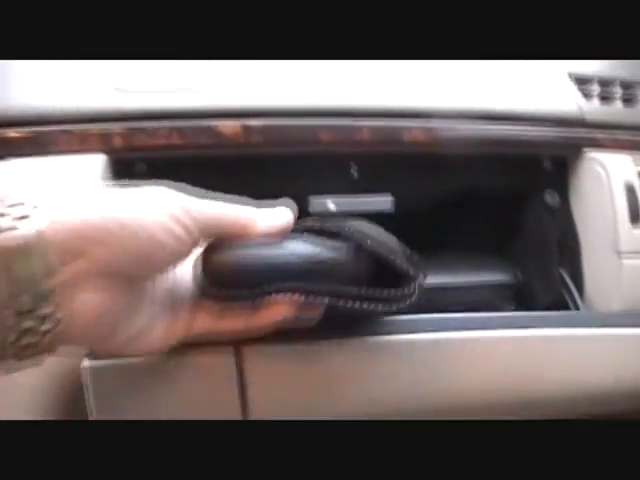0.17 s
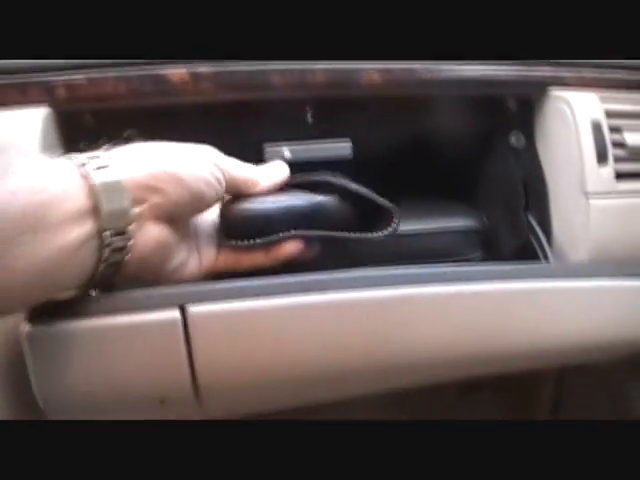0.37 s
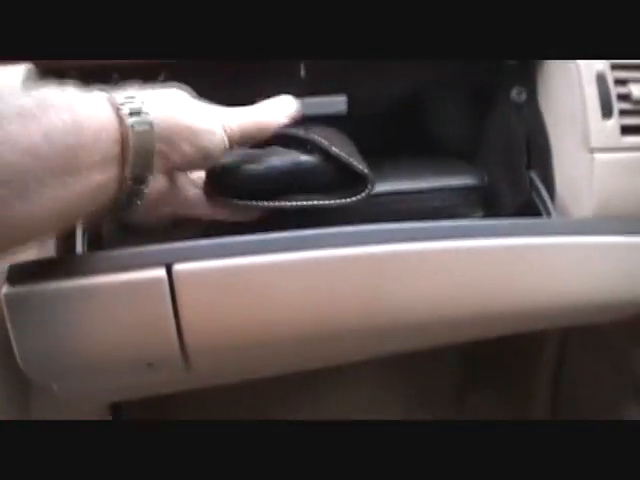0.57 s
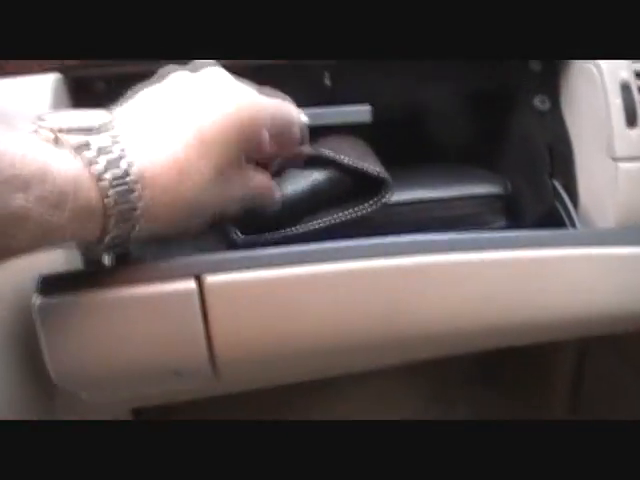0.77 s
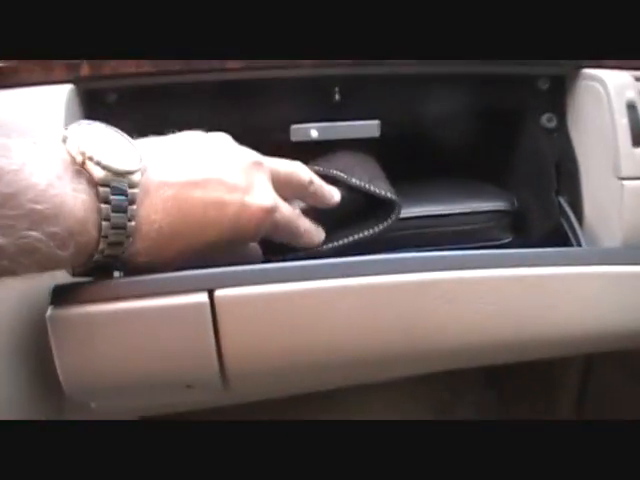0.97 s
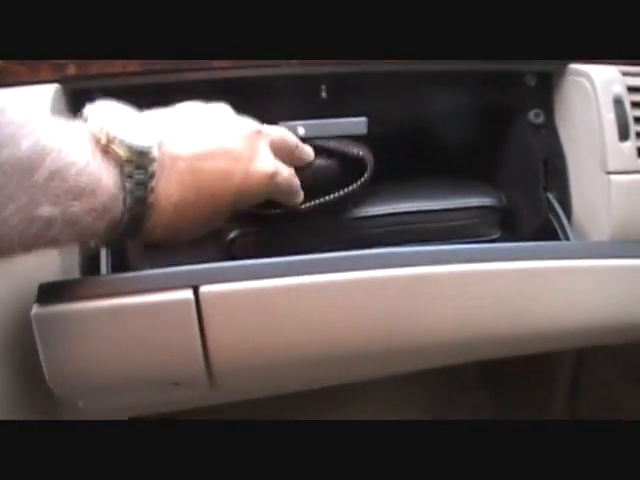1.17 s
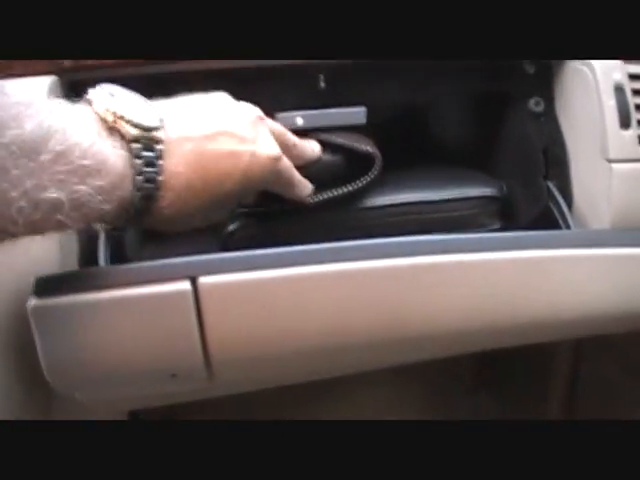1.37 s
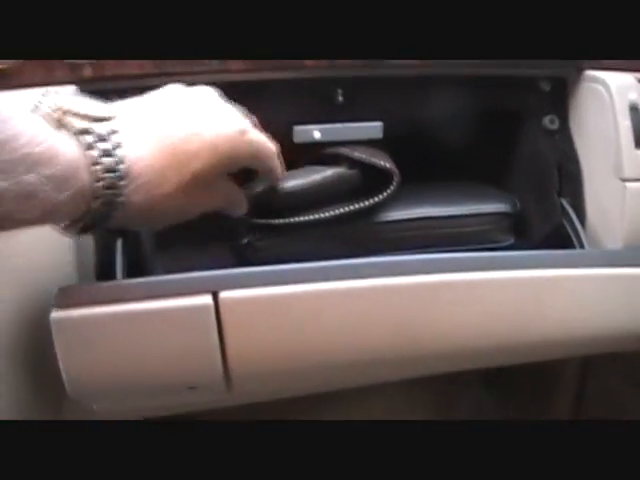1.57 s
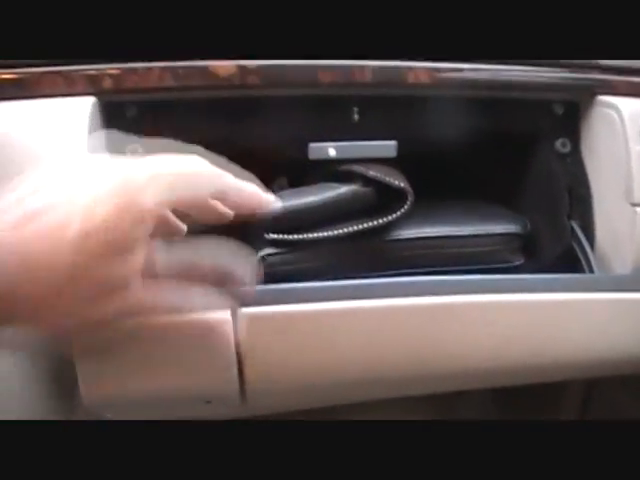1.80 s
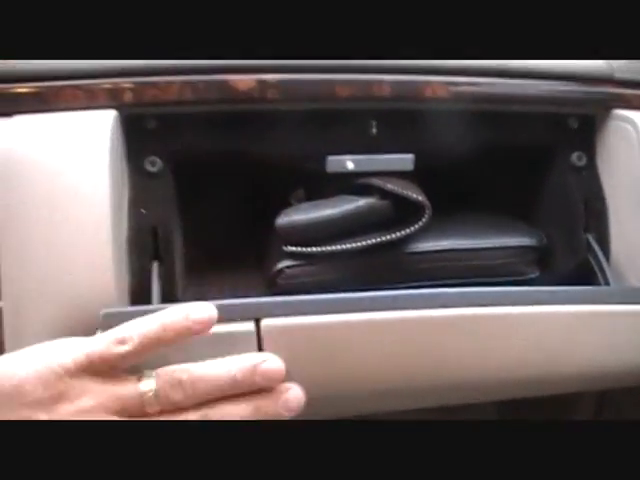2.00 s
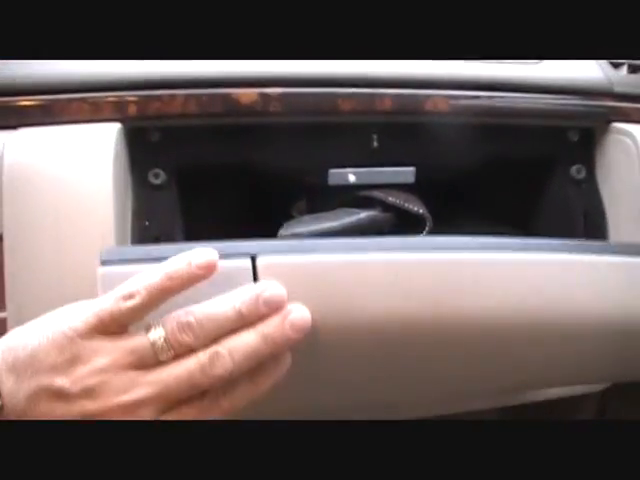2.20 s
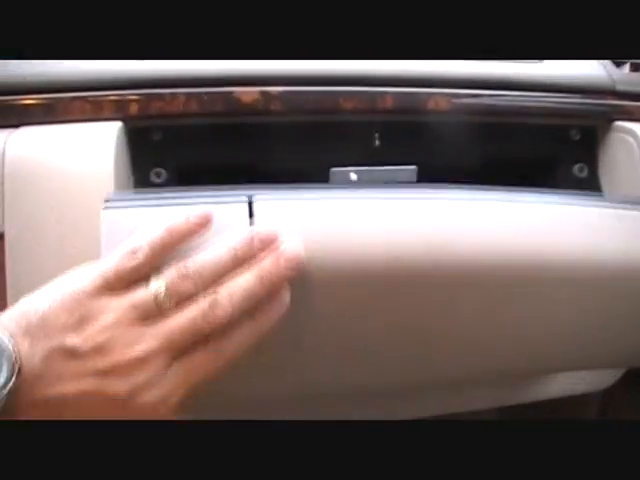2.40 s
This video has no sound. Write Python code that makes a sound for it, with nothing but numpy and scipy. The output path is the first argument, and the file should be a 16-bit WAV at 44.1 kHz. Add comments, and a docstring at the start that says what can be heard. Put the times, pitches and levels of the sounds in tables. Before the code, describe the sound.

A leather case goes into a car glove compartment: faint clicks and thin watch-band ticks, then a loud scrape and hollow double knock around 0.25-0.35 s. Leather slides from 0.4 to 0.75 s with plastic clicks, is nudged again near 1.1 s, and settles with a soft low thump at 1.2 s. A click at 1.7 s, then lid rattles from 2.05 s. Close, dry, faint cabin hiss.

```python
"""A leather case, dropped by a hand into the open glove compartment of a parked car, slides along the lining.
Filtered noise makes its scrapes, hiss and dull knocks; decaying modes make the ring of the hollow box.
Short noise bursts with modes make the clicks and lid rattle as the lid is pushed up, and the watch band's ticks.
Sagging tones make soft thumps. The small padded cabin is almost dead: only faint air hiss, no reverberation."""
import sys
import numpy as np
from scipy import signal
from scipy.fft import rfft, irfft
from scipy.io import wavfile

SR = 44100
rng = np.random.default_rng(int(sys.argv[2]) if len(sys.argv) > 2 else 0)


def store_wav(level_fs):
    """Save 16-bit WAV to argv[1]."""
    pcm = np.round(np.clip(np.atleast_2d(level_fs), -1, 1) * 32767)
    wavfile.write(sys.argv[1], SR, pcm.T.astype(np.int16))


N = 108045
TIME = np.arange(N) / SR  # s


def from_db(db):
    """Level definition: an amplitude ratio is 10 to the power dB/20."""
    return 10 ** (np.asarray(db) / 20)


def rms_one(x):
    """Normalisation: scale to unit root-mean-square amplitude."""
    return x / np.sqrt(np.mean(x ** 2) + 1e-20)


def at_hz(points, hz):
    """Logarithmic frequency scale: interpolate a table linearly in log f."""
    f, value = np.transpose(points)
    return np.interp(np.log(hz), np.log(f), value)


def level_curve(rows):
    """Amplitude envelope: gain through (t/s, level/dB) points, silent before the first."""
    s, db = np.transpose(rows)
    return from_db(np.interp(TIME, s, db)) * (TIME >= s[0])


def decay(age, t60):
    """Exponential decay: the level falls 60 dB in each t60."""
    return np.exp(-np.log(1000) * age / t60)


def burst(start, hold, t60):
    """Transient envelope: sudden start, hold, exponential decay."""
    age = TIME - start
    fade = np.maximum(decay(np.maximum(age - hold, 0), t60), np.exp(-20))
    return (age >= 0) * fade


def band_noise(edges):
    """Band limitation: white noise through a band-pass filter, rms 1."""
    sos = signal.butter(3, edges, "band", fs=SR, output="sos")
    return rms_one(signal.sosfilt(sos, rng.standard_normal(N)))


def coloured(spectrum):
    """Spectral shaping: weight noise by a table of f/Hz, density/dB, then scale to rms 1."""
    hz = np.maximum(np.arange(N // 2 + 1) * SR / N, 1)
    white = rfft(rng.standard_normal(N))
    return rms_one(irfft(white * from_db(at_hz(spectrum, hz)), N))


def grain(per_s, depth_db):
    """Amplitude modulation: the quick random flutter of a rubbing contact, rms 1."""
    steps = rng.standard_normal(N)
    return rms_one(from_db(depth_db * np.interp(TIME * per_s, np.arange(N), steps)))


def impulses(rows):
    """Impulsive excitation: one impulse for each (t/s, level/dB)."""
    out = np.zeros(N)
    for s, db in rows:
        out[int(np.clip(s * SR, 0, N - 1))] += from_db(db)
    return out


MODE_SPREAD_S = .003  # the modes reach the ear up to this much apart


def ring(force, modes):
    """Modal superposition: a force drives damped resonators, each heard a little late."""
    out = 0
    for (hz, db, t60), late in zip(modes, rng.random(len(modes))):
        r = decay(1 / SR, t60)
        w = 2 * np.pi * hz / SR
        tone = signal.lfilter([0, np.sin(w)], [1, -2 * r * np.cos(w), r * r], force + 1e-18)
        # nothing sounds far below a mode
        tone = signal.sosfilt(signal.butter(2, hz / 2, "high", fs=SR, output="sos"), tone)
        delay = int(late * MODE_SPREAD_S * SR)
        out = out + from_db(db) * np.pad(tone, (delay, 0))[:N]
    return out


# dull knocks of the case on the box: t/s, relative level/dB
KNOCKS = [(0.2680, -26.5), (0.2985, -18.5), (0.3342, -26), (0.4760, -33), (0.5690, -44), (0.8390, -57),
          (0.8710, -41.5), (0.9190, -50), (1.4530, -51), (2.1640, -36.5), (2.3980, -58), (2.4160, -51.5),
          (2.4350, -53)]
# spectrum of their puff: f/Hz, relative density/dB
KNOCK_COLOUR = [(30, -45), (50, -42), (130, -24), (300, -19.5), (600, -5), (950, -14.5), (1500, -28),
                (3000, -37), (8000, -37.5), (16000, -34)]
# modes of the hollow box, also driven by scraping and rubbing: f/Hz, relative level/dB, t60/s
BOX = [(404.4, -9.5, 0.14), (512, -10, 0.16), (613.4, 1.5, 0.099), (768, -9.5, 0.14), (866, -1.5, 0.073),
       (897, -10, 0.078), (928, -16, 0.12), (1022, -10, 0.17), (1247, -9, 0.071), (1400, -13, 0.066),
       (1664, -17, 0.082), (1750, -29, 0.067), (1900, -30, 0.14), (2070, -28, 0.063)]
KNOCK_PUSH_S, KNOCK_T60_S = 0.0075, 0.054
KNOCK_PUFF_DB, KNOCK_RING_DB = -8.5, -2.5


def knocks():
    """Impact excitation: the padded case gives a dull puff of noise and sets the box modes ringing."""
    envelope = sum(from_db(db) * burst(s, KNOCK_PUSH_S, KNOCK_T60_S) for s, db in KNOCKS)
    puff = envelope * coloured(KNOCK_COLOUR)
    box = ring(impulses(KNOCKS), BOX)
    return from_db(KNOCK_PUFF_DB) * puff + from_db(KNOCK_RING_DB) * box


# the case scrapes in over the edge: t/s, relative level/dB
SCRAPE = [(0.2395, -54), (0.2425, -27), (0.250, -25), (0.266, -23.5), (0.273, -23), (0.283, -30),
          (0.295, -32), (0.318, -42.5), (0.352, -61)]
# spectrum of the scrape: f/Hz, relative density/dB
SCRAPE_COLOUR = [(30, -42), (60, -42), (125, -8), (340, -19), (760, -6), (1100, -7), (1500, -4.5),
                 (2100, -10.5), (3200, -13), (4400, -20), (12000, -16), (16000, -33)]
SCRAPE_FLUTTER_PER_S, SCRAPE_RING_DB = 700, -1


def scrape():
    """Frictional excitation: dense random slips sound directly and drive the box modes."""
    effort = level_curve(SCRAPE) * (TIME < SCRAPE[-1][0])
    effort = effort * grain(SCRAPE_FLUTTER_PER_S, depth_db=2.0)
    slips = rng.standard_normal(N)
    box = ring(slips * effort, BOX) / np.std(ring(slips, BOX))
    return effort * coloured(SCRAPE_COLOUR) + from_db(SCRAPE_RING_DB) * box


# two strokes of leather on the lining: t/s, level/dB
PUSH = [(0.402, -56), (0.414, -37), (0.44, -39), (0.54, -37), (0.60, -44.5), (0.625, -44), (0.675, -40.5),
        (0.715, -43.5), (0.76, -67)]
NUDGE = [(1.06, -60.5), (1.11, -41.5), (1.165, -40.5), (1.205, -37.5), (1.235, -55), (1.27, -55),
         (1.305, -70), (1.335, -61), (1.38, -90)]
# spectra of the strokes: f/Hz, relative density/dB
PUSH_COLOUR = [(30, -40), (300, -30), (612, -1.5), (1450, -4.5), (2380, -8.5), (6170, -12), (8500, -5),
               (10700, 2), (14100, -10), (16000, -21)]
NUDGE_COLOUR = [(120, -46), (200, -31), (409, -34), (529, -22), (883, -3.5), (1230, -13.5), (2210, -11),
                (2650, -11), (7010, -9), (10100, 1.5), (16000, -16)]
# light brushes of hand and leather: t at the middle/s, standard deviation/s, level/dB
BRUSHES = [(0.0, 0.014, -54.5), (0.09, 0.065, -56.5), (0.728, 0.0073, -56), (0.805, .012, -51.5),
           (0.836, 0.0093, -53), (0.857, 0.0072, -73), (0.962, 0.0082, -62), (1.005, 0.027, -59),
           (1.281, 0.012, -48.5), (1.335, 0.016, -50), (1.448, 0.011, -52), (1.913, 0.0078, -54),
           (2.139, 0.041, -45), (2.28, 0.035, -61)]
# spectrum of the brushes: f/Hz, relative density/dB
BRUSH_COLOUR = [(200, -9), (700, -9), (1400, -3), (3000, -10.5), (6000, -13), (10000, -4), (13000, -8.5),
                (16000, -22)]


def sliding():
    """Friction noise: fine-grained hiss of leather on the lining, with bell-shaped light brushes."""
    push = level_curve(PUSH) * (TIME < PUSH[-1][0]) * coloured(PUSH_COLOUR)
    nudge = level_curve(NUDGE) * (TIME < NUDGE[-1][0]) * coloured(NUDGE_COLOUR)
    touch = sum(from_db(db) * np.exp(-.5 * ((TIME - s) / width) ** 2) for s, width, db in BRUSHES)
    brushes = touch * coloured(BRUSH_COLOUR) * grain(250, depth_db=3.0)
    return (push + nudge) * grain(400, depth_db=1.5) + brushes


# limits of the half-octave noise bands: f/Hz
EDGES_HZ = np.geomspace(28, 17500, 20)
CENTRES_HZ = np.sqrt(EDGES_HZ[1:] * EDGES_HZ[:-1])
# where the click spectra are given: f/Hz
BANDS_HZ = [200, 800, 1900, 5000, 10500]
# hard contacts in the compartment, then of the lid as it is pushed up:
# t/s, contact length/s, ring level/dB, then relative level per octave/dB at each of BANDS_HZ
CLICKS = [(0.097, 0.0062, -84, -81, -58, -40.5, -49, -48.5),
          (0.1276, 0.0038, -65, -72, -70, -41, -45, -45.5), (0.132, 0.004, -42.5, -97, -46, -52, -72, -68),
          (0.145, .002, -83, -87.5, -80, -49.5, -44.5, -64),
          (0.412, 0.0044, -59, -75, -34.5, -35, -35.5, -79),
          (0.5950, 0.003, -42.5, -86, -39, -31.5, -43, -38.5),
          (0.7076, 0.00074, -62, -87, -56, -41, -39.5, -38),
          (0.990, 0.0053, -54.5, -73, -71, -47.5, -58, -44),
          (1.6834, 0.0078, -35.5, -63, -41, -41.5, -35.5, -34.5),
          (1.905, 0.013, -76, -101, -60, -58, -86, -53)]
LID_CLICKS = [(2.049, 0.0044, -51.5, -73, -56, -49, -50, -68),
              (2.055, 0.0026, -45, -49, -55, -44.5, -46.5, -35),
              (2.075, 0.0097, -46, -62, -32, -38.5, -46, -43),
              (2.099, 0.0045, -34.5, -70, -36, -31, -31.5, -29.5),
              (2.114, 0.0039, -35.5, -58, -42, -40, -54, -45), (2.153, 0.01, -50, -48, -46, -41, -42, -52),
              (2.163, 0.0086, -45.5, -49, -37, -35.5, -42.5, -39.5),
              (2.224, .006, -56, -62, -56, -55, -65, -76),
              (2.304, 0.0025, -48.5, -69, -44, -39.5, -45.5, -44),
              (2.3642, 0.003, -43.5, -54.5, -40.5, -38.5, -38, -42)]
# how fast a contact dies in the compartment: f/Hz, t60/s
CLICK_DECAY = [(200, 0.17), (800, 0.072), (2000, 0.05), (5000, 0.053), (11000, 0.058)]
# modes of the plastic frame and of the lid: f/Hz, relative level/dB, t60/s
FRAME = [(730, -8.5, 0.12), (887, -2.5, .08), (1050, -2, 0.057), (1374, -10, 0.075), (1626, -2, 0.042),
         (1816, -2, 0.07), (2236, -0.5, 0.021), (2606, -6.5, 0.066), (3430, 0, 0.056), (3682, -25, 0.066),
         (6180, -8, 0.059), (6500, -15, 0.061)]
LID = [(585, -3, 0.084), (639, -5, 0.085), (779, 1.5, 0.083), (904, -0.5, 0.051), (1050, -9, 0.051),
       (1210, 0.5, 0.073), (1272, 4.5, 0.029), (1793, -15, .06), (1974, -4, .06), (2120, 1, 0.024),
       (2180, -13, 0.032), (2705, -1, 0.04)]
CLICK_DB, CLICK_SNAP_DB, SNAP_S = -3.5, 3, 0.0033


def plastic_clicks():
    """Frequency-dependent damping: contacts snap, hold and die, lows last; frame or lid modes ring on."""
    out = 0
    for rows, modes in [(CLICKS, FRAME), (LID_CLICKS, LID)]:
        out = out + ring(impulses([(row[0], row[2]) for row in rows]), modes)
    for hz, edges in zip(CENTRES_HZ, zip(EDGES_HZ, EDGES_HZ[1:])):
        band = band_noise(edges)
        t60 = at_hz(CLICK_DECAY, hz)
        low_cut = min(1, hz / BANDS_HZ[0]) ** 2
        top_cut = from_db(-16 * max(0, np.log2(hz / BANDS_HZ[-1])))
        for s, hold, _, *levels in CLICKS + LID_CLICKS:
            start = int(s * SR)
            span = slice(start, start + SR // 5)
            age = TIME[span] - TIME[span][0]
            snap = from_db(CLICK_SNAP_DB * np.exp(-age / SNAP_S))
            shape = decay(np.maximum(age - hold, 0), t60) * snap
            db = np.interp(np.log(hz), np.log(BANDS_HZ), levels)
            gain = from_db(CLICK_DB + db) * np.sqrt(.5)  # half an octave carries half the power
            out[span] += gain * low_cut * top_cut * shape * band[span]
    return out


# watch band links: t/s, relative level/dB, lower band edge f/Hz, ring level relative to the tick/dB
LINKS = [(0.2057, -34, 9000, -30), (0.2128, -25.5, 8500, -36), (1.5020, -36, 10300, -28),
         (1.5654, -27, 5600, -32), (1.7680, -44, 5000, -20), (1.7950, -38, 6070, -11.5),
         (1.924, -34.5, 7740, -7), (1.9415, -43, 7500, -20), (2.0455, -37, 6880, -26)]
# modes of a link: f/Hz, relative level/dB, t60/s
LINK_MODES = [(8600, 2, 0.04), (10300, -2, .06), (12920, -11, .04)]
LINK_SNAP_S, LINK_TAIL_DB, LINK_T60_S, LINK_TOP_HZ = 0.00025, -16.5, 0.081, 13250


def watch_band():
    """Small-body resonance: steel links give a bright snap, a short scatter and a thin high ring."""
    out = ring(impulses([(s, db + ring_db) for s, db, _, ring_db in LINKS]), LINK_MODES)
    for s, db, hz, _ in LINKS:
        noise = band_noise([min(hz, .9 * LINK_TOP_HZ), LINK_TOP_HZ])
        snap = .5 * burst(s, LINK_SNAP_S, 0.0031)
        scatter = from_db(LINK_TAIL_DB) * burst(s, 0, LINK_T60_S)
        out = out + from_db(db) * (snap + scatter) * noise
    return out


# the case settles: t/s, level/dB
THUMPS = [(0.477, -46), (0.555, -49), (1.2072, -31)]
# spectrum of the puff in a thump: f/Hz, relative density/dB
THUMP_COLOUR = [(40, -30), (130, 5.5), (260, 2), (380, -17), (550, 0), (1300, -12.5), (3000, -26),
                (16000, -41)]
# low boom of the dashboard: f/Hz, relative level/dB, t60/s
DASH = [(137, -11.5, .18), (181, -14, 0.15)]
THUMP_HZ, THUMP_END_HZ, THUMP_SAG_S = 303, 146, 0.017
THUMP_RISE_S, THUMP_HOLD_S, THUMP_T60_S, THUMP_PUFF_DB = 0.0023, 0.011, 0.079, -6.5


def thumps():
    """Falling-pitch transient: the case settles on the soft wallet under it and the dashboard booms."""
    out = ring(impulses(THUMPS), DASH)
    puff = from_db(THUMP_PUFF_DB) * coloured(THUMP_COLOUR)
    for s, db in THUMPS:
        age = np.maximum(TIME - s, 0)
        sag = np.exp(-age / THUMP_SAG_S)
        hz = (THUMP_END_HZ + (THUMP_HZ - THUMP_END_HZ) * sag) * (age > 0)
        tone = np.sin(2 * np.pi * np.cumsum(hz) / SR)
        shape = np.minimum(age / THUMP_RISE_S, 1) * burst(s, THUMP_HOLD_S, THUMP_T60_S)
        out = out + from_db(db) * shape * (tone + puff)
    return out


# the box murmurs while things rub in it: t/s, relative level/dB
RUB = [(0.38, -81), (0.42, -47), (0.58, -42.5), (0.64, -62), (0.86, -48.5), (1.05, -67.5), (1.2, -48),
       (1.4, -64), (2.03, -78), (2.06, -45), (2.14, -39.5), (2.21, -55.5), (2.34, -59), (2.43, -57)]
# spectrum of the rubbing: f/Hz, relative density/dB
RUB_COLOUR = [(30, -35), (60, -37), (170, -7), (320, -10), (600, 2.5), (1000, -2.5), (1800, -10),
              (4000, -18), (16000, -64)]
RUB_DB, RUB_RING_DB = -4.5, -10.5


def box_murmur():
    """Sustained random excitation: uneven rubbing keeps the hollow box sounding."""
    rubbing = from_db(RUB_DB) * coloured(RUB_COLOUR)
    box = from_db(RUB_RING_DB) * rms_one(ring(rng.standard_normal(N), BOX))
    return level_curve(RUB) * grain(90, depth_db=5.5) * (rubbing + box)


# spectrum of the cabin hiss: f/Hz, relative density/dB
CABIN_AIR = [(25, -10), (60, -7), (150, -3), (300, -5), (560, -6.5), (1000, -9.5), (1800, -10.5),
             (6050, -13.5), (10000, -11.5), (13000, -16), (16000, -27.5)]
CABIN_AIR_DB = -60.5


def cabin_air():
    """Stationary background noise: the faint steady hiss of the quiet cabin."""
    return from_db(CABIN_AIR_DB) * coloured(CABIN_AIR)


def scene():
    """Linear superposition: every source straight ahead, identical in both channels, over the cabin hiss."""
    mono = knocks() + scrape() + sliding() + plastic_clicks() + watch_band() + thumps() + box_murmur()
    # small parts radiate no deep bass
    mono = signal.sosfilt(signal.butter(2, 75, "high", fs=SR, output="sos"), mono)
    mono = mono + cabin_air()
    return np.array([mono, mono])


CUTOFF_HZ = 15900


def record(dry):
    """Low-pass filtering: the top is cut steeply."""
    return signal.sosfilt(signal.ellip(10, .2, 80, CUTOFF_HZ, fs=SR, output="sos"), dry)


dry = scene()
out = record(dry)
store_wav(out)
```